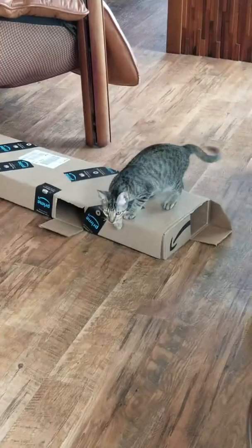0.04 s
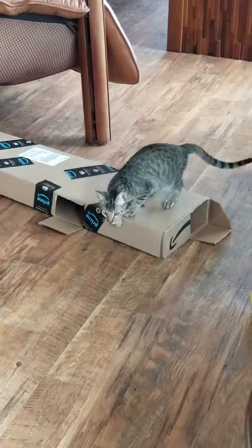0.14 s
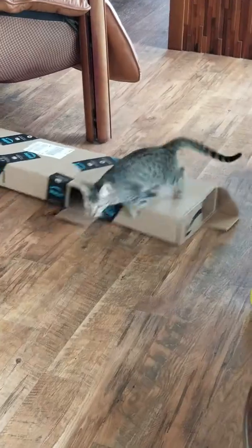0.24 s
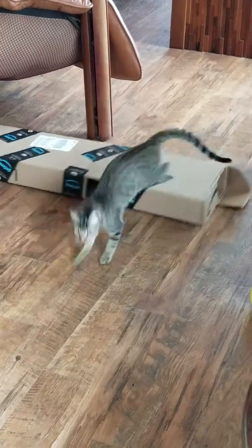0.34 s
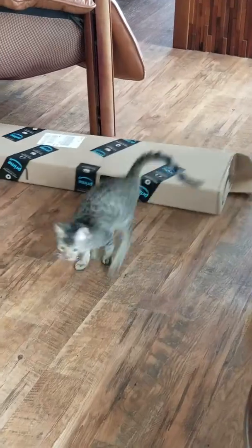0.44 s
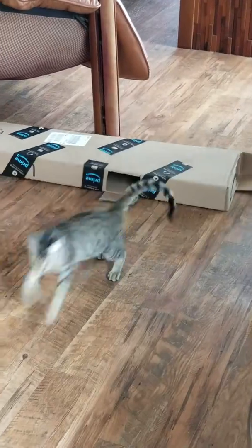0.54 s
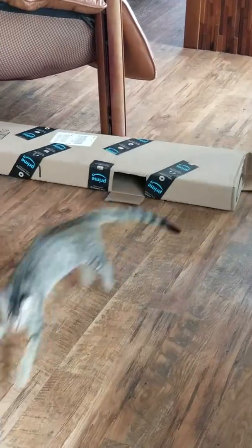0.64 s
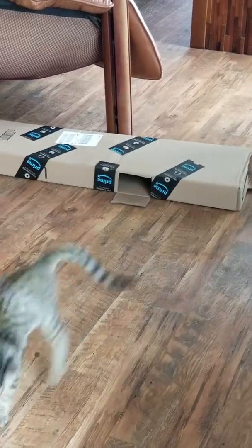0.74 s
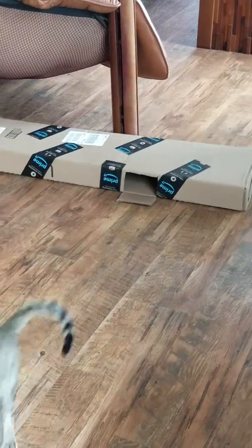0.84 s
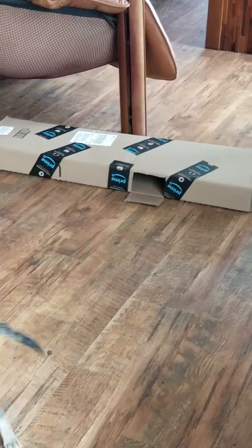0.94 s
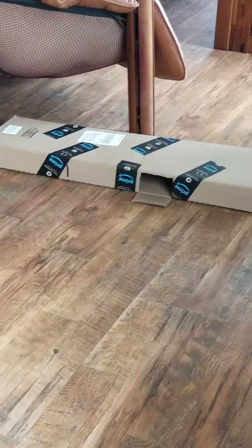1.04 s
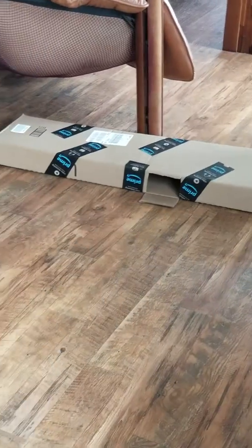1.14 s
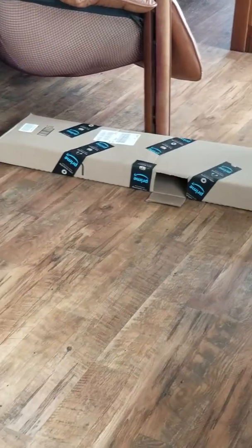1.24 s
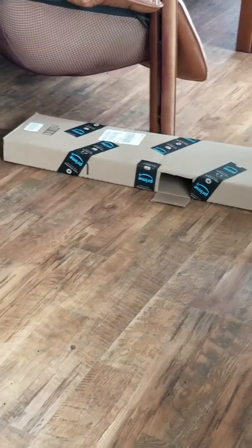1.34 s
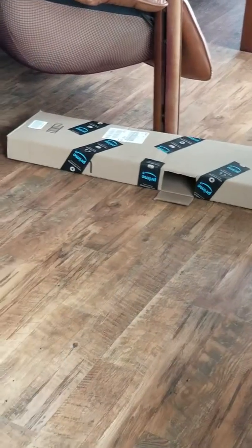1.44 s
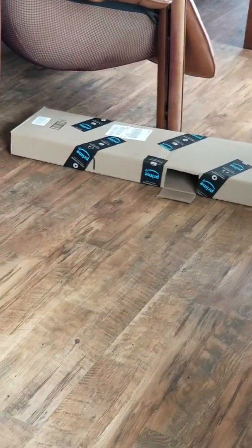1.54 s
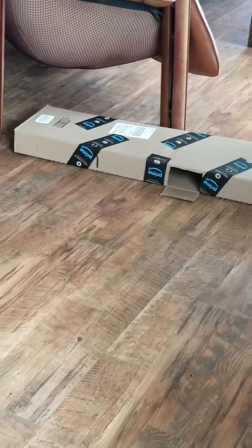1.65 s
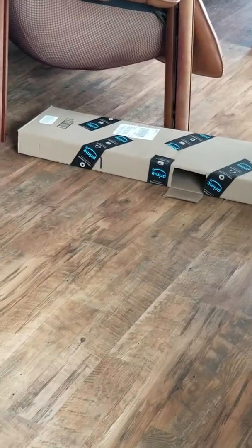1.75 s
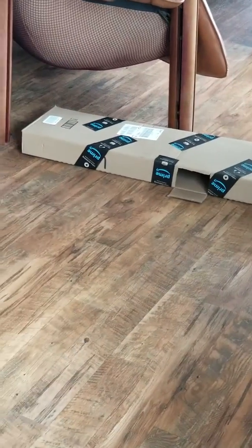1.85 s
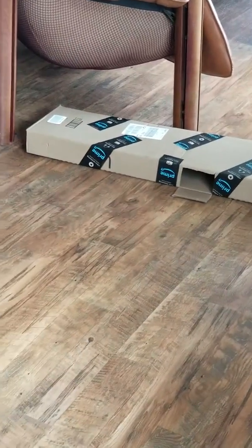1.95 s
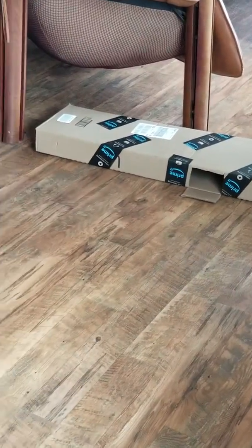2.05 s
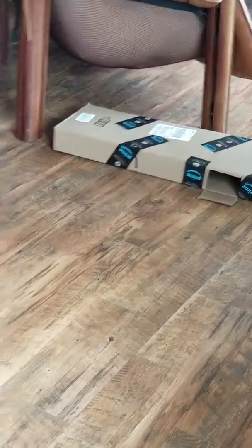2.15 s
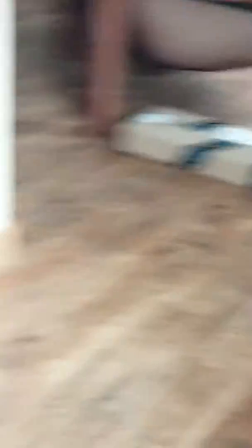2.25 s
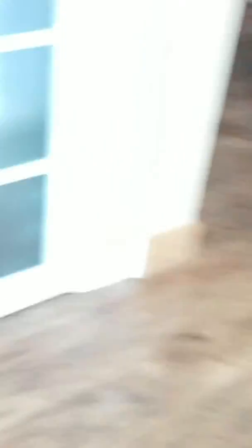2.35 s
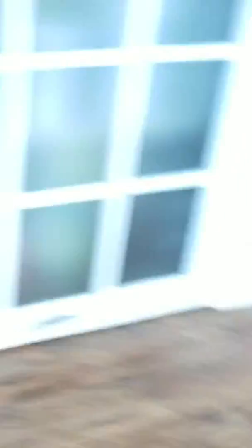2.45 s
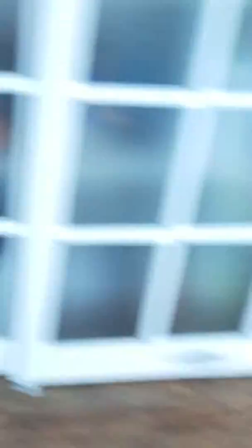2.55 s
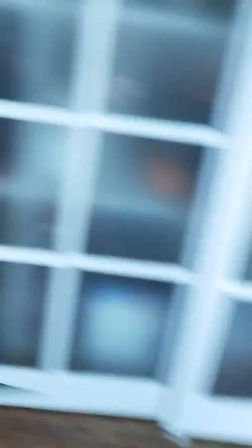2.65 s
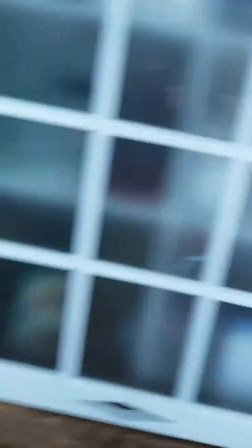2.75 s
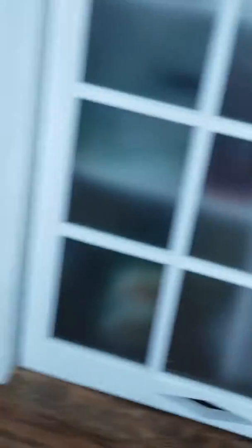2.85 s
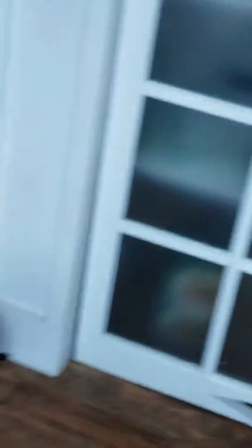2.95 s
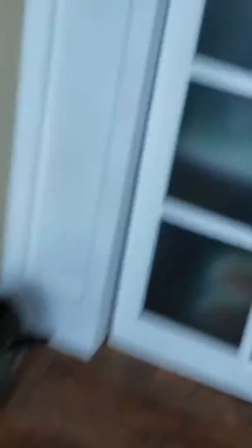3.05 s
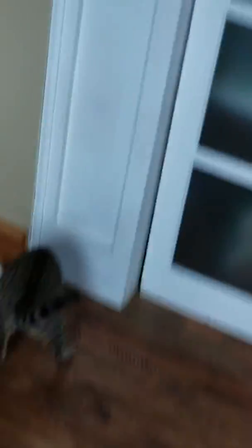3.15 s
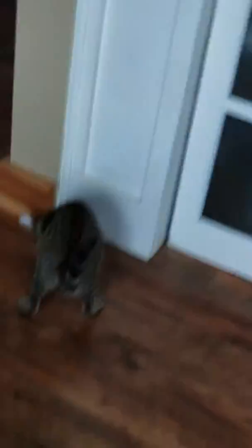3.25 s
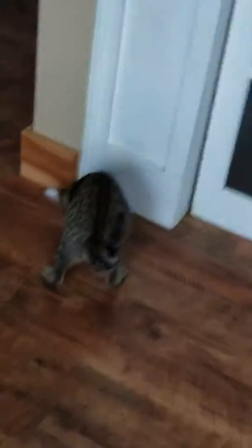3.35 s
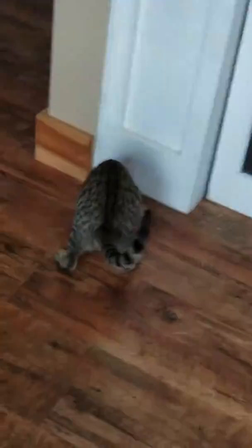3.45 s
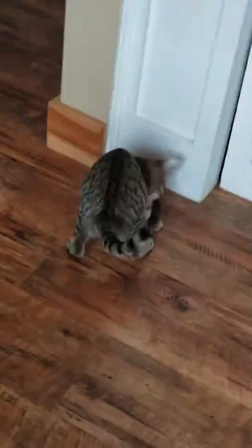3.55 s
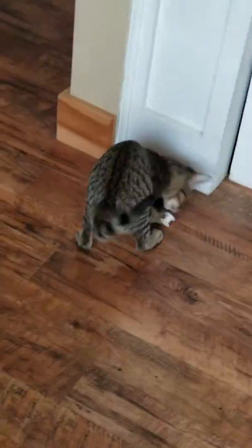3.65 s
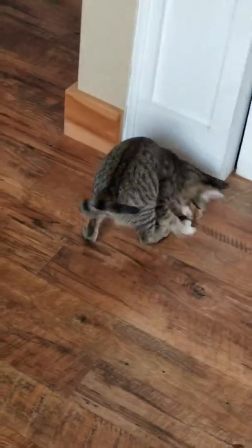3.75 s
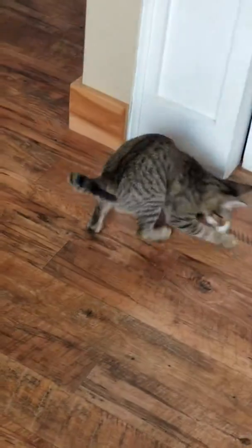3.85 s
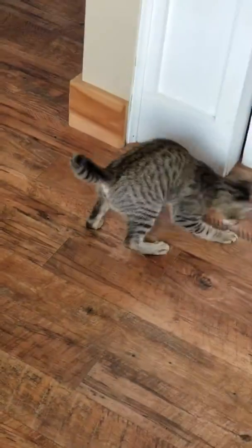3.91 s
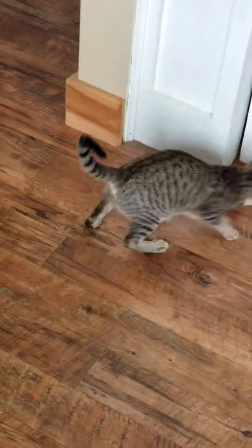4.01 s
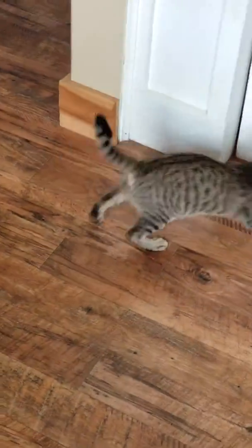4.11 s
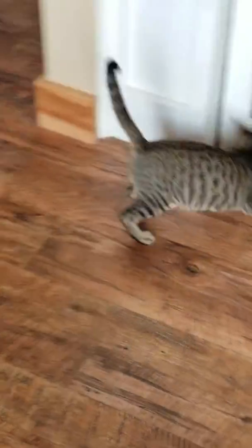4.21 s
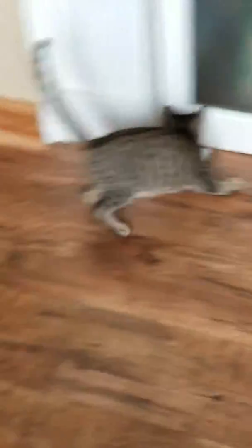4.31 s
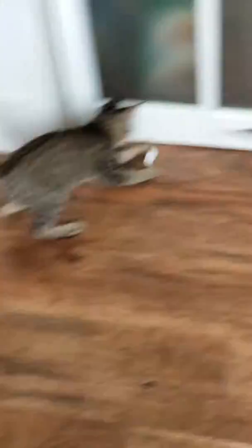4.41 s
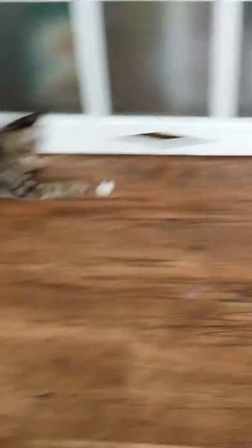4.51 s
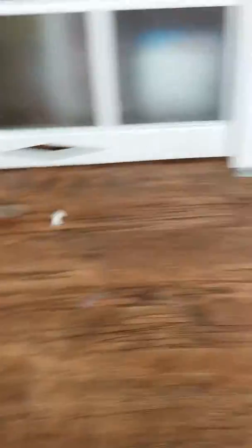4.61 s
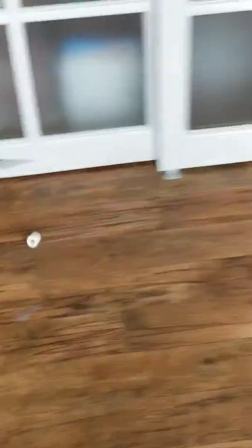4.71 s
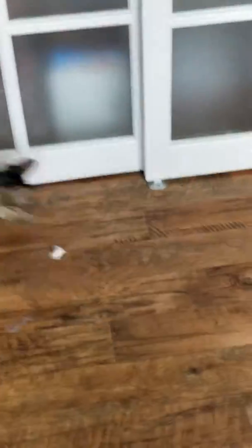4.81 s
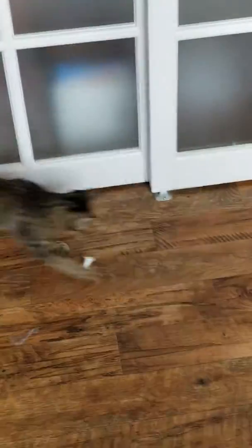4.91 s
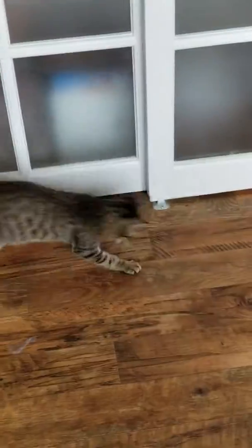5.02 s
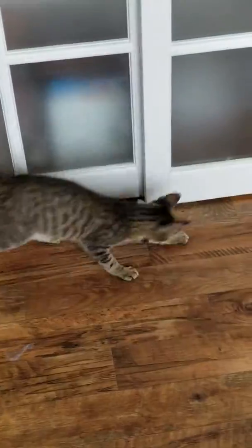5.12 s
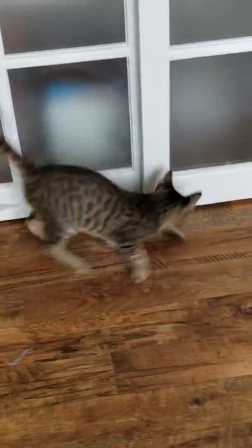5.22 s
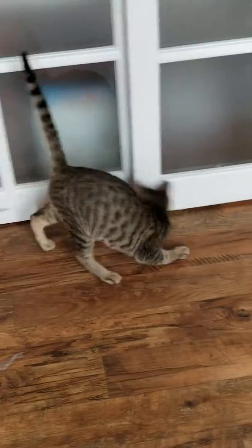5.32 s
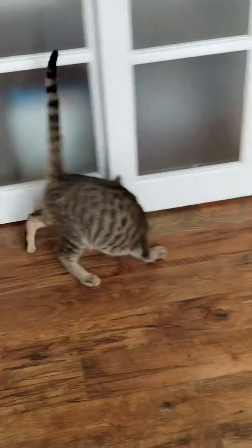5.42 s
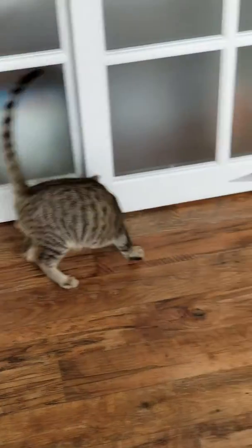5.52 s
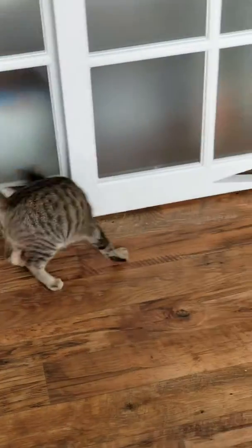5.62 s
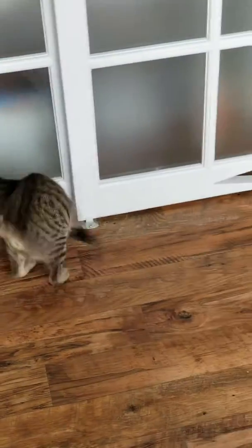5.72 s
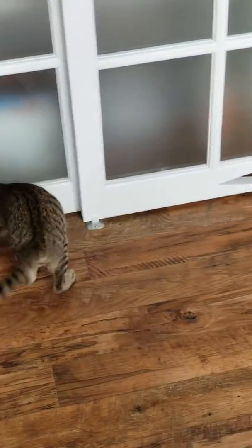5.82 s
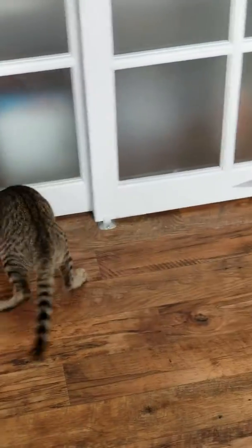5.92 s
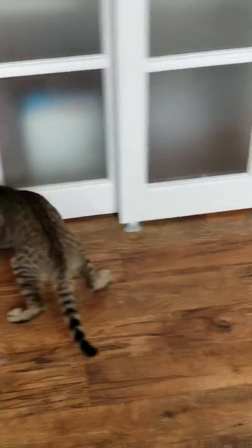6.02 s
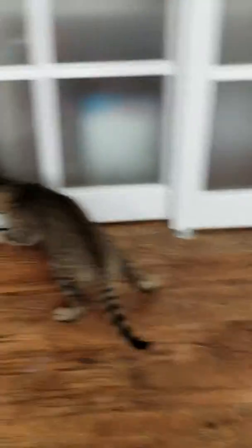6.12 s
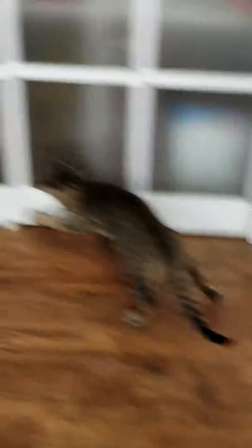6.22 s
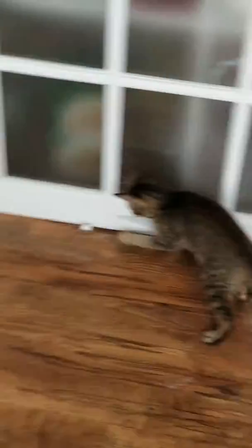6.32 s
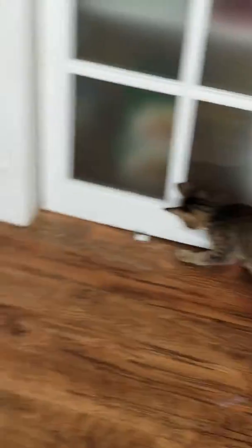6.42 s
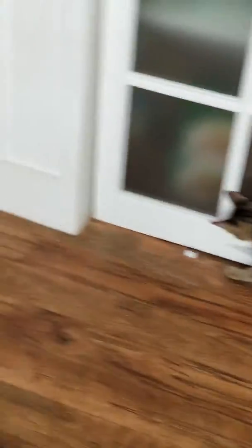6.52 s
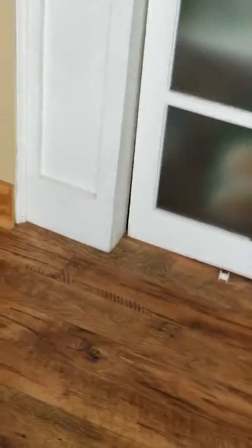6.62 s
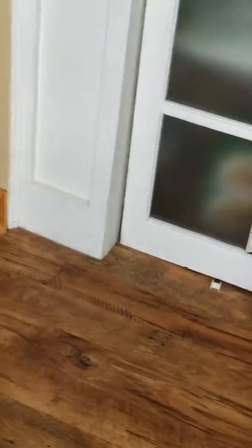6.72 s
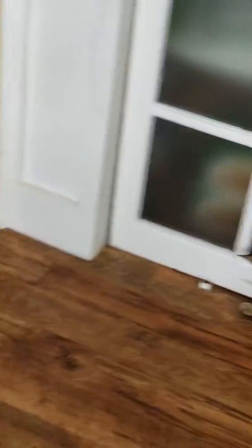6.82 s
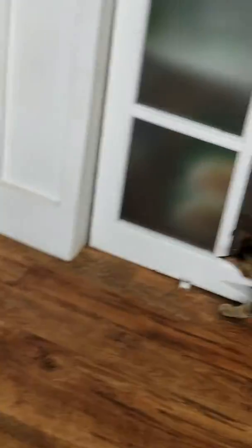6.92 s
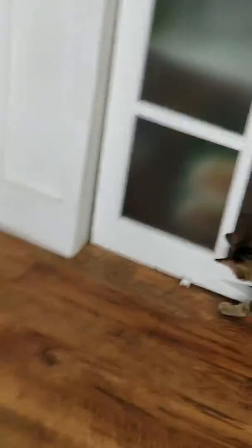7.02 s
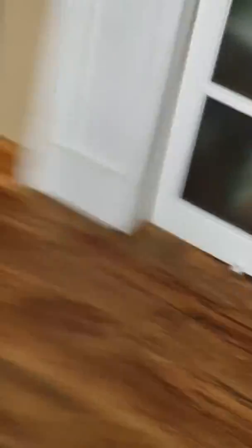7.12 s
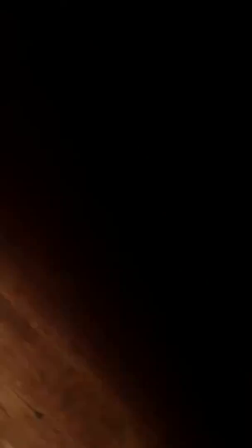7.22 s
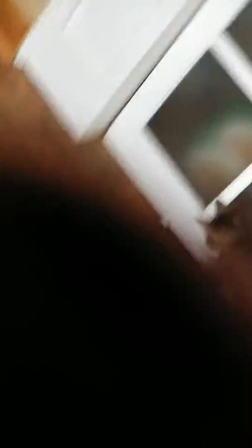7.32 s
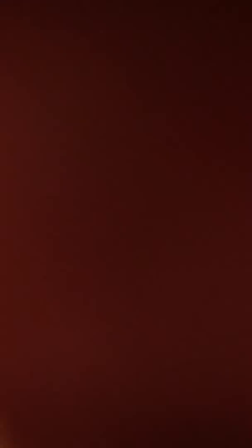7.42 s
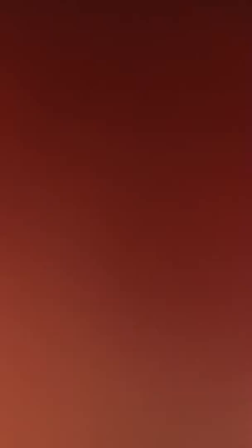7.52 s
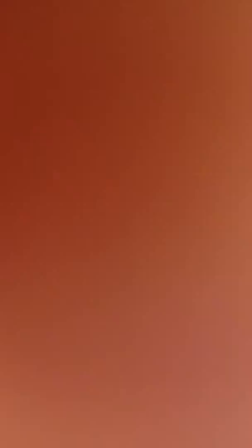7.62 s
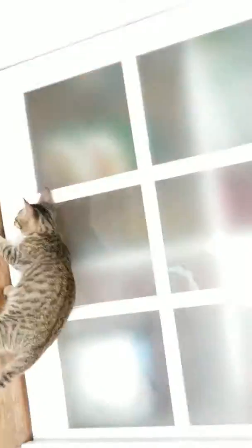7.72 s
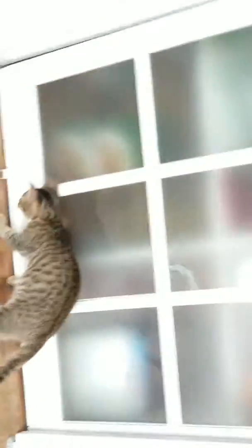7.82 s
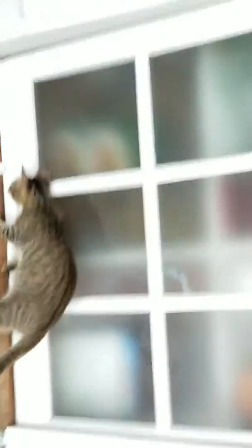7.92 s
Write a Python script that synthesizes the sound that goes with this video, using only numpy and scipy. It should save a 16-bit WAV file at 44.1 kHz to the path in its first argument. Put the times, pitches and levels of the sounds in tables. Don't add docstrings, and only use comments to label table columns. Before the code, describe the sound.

A cat bats a small hard toy with a tiny bell across bare wooden boards, knocking and jingling, before a hand rubs the microphone.

```python
import sys
import numpy as np
from scipy import signal
from scipy.fft import rfft, irfft, next_fast_len
from scipy.io import wavfile
from scipy.ndimage import uniform_filter1d, map_coordinates

SR = 44100
rng = np.random.default_rng(int(sys.argv[2]) if len(sys.argv) > 2 else 0)


def persist_wave(psi):
    counts = np.round(np.clip(psi, -1, 1) * 32767).astype(np.int16)
    wavfile.write(sys.argv[1], SR, np.atleast_2d(counts).T)


def undo_db(level):
    steps = np.asarray(level, float) / 20
    return 10 ** steps


N = 351036

# (time [s], peak level [dB], pitch [Hz], dull part [dB], ringing part [dB])
HITS = [(0.6688, -45.5, 2300, -16, -11), (0.8612, -31.5, 3900, -17.5, 6), (0.8926, -10, 1050, -28.5, -0.5),
        (1.0452, -28.5, 1920, -26, -2), (1.1686, -27, 2440, -9, 0.5), (1.3673, -23.5, 1330, -25, 6),
        (1.52, -32, 2480, -30, 4.5), (1.604, -29.5, 1970, -8, 3.5), (1.816, -32, 1070, -1.5, 2.5),
        (2.2552, -46.5, 2920, -25, 11), (2.4689, -44, 3620, 1.5, -12), (2.7832, -45, 850, -5, 3),
        (3.121, -53.5, 2065, -1, 1.5), (3.8007, -20.5, 2115, -32, 3.5), (3.941, -13.5, 1470, -11, 3.5),
        (4.15, -11, 2240, -17, -5), (4.59, -25.5, 2120, -33, 2.5), (4.6583, -42, 1090, -26, 15.5),
        (4.939, -18.5, 2040, -27, 4.5), (5.0819, -20.5, 1840, -6.5, 4), (5.472, -38, 1030, 3, 7),
        (5.659, -30.5, 2300, -10, -1), (5.767, -26.5, 2010, -5.5, -4), (5.8055, -12, 2200, -50, -19),
        (5.9427, -41.5, 2060, -1, 14), (6.2524, -34, 2100, -19, -1), (1.9638, -42.5, 1680, 5, 10.5)]
# (time [s], peak level [dB], pitch [Hz], dull part [dB], ringing part [dB])
TAPS = [(1.1154, -33.5, 1200, -17, 6.5), (1.3018, -22, 2080, -24, 4), (1.424, -25, 2670, -27, 3.5),
        (1.9556, -34.5, 920, 3, 6.5), (2.11, -43, 890, 0, 6), (2.6728, -42.5, 2400, -11, 6),
        (3.649, -40, 1290, -7, 3), (3.6694, -33, 1220, -24, 0), (3.713, -28, 1960, -32, 2),
        (3.7872, -32.5, 1750, -32, -2), (4.1128, -31.5, 1000, -6, 12.5), (4.2624, -29, 3320, -19, 4.5),
        (4.369, -34.5, 1010, -29, 11), (4.4355, -30, 2100, -38, -2), (4.51, -38, 1520, -5, 12.5),
        (4.7316, -35, 1830, -14, 4), (4.7905, -43, 1800, 2, 12.5), (4.873, -42, 1460, 3, 12.5),
        (5.2019, -26.5, 2040, -10, 5), (5.234, -28, 1820, -2, 4.5), (6.0161, -37.5, 1720, -1, 6.5),
        (6.115, -38, 1700, -2.5, 10), (6.319, -38.5, 1680, -13, 9.5), (6.351, -38.5, 2120, -7.5, 3.5),
        (4.402, -32.5, 1950, -27, 4), (2.395, -56.5, 2600, -20, 12), (2.529, -50.5, 700, 5, 17),
        (2.6, -53, 666, -1, 19.5), (2.735, -51, 600, -10, 15.5), (2.142, -44, 447, -14, 14.5),
        (6.152, -43, 3450, -20, -11), (3.848, -31, 2140, -28, -3), (3.9003, -52, 3000, -28, -2)]
HIT_BRIGHT_DB, TAP_BRIGHT_DB = -14.5, -17.5
HIT_TOP_HZ, TAP_TOP_HZ = 4400, 3200
DIRECT_DB = 0.5
NEAR_SHARE = 0.6
PLACES = 4

# (time [s], pitch [Hz], peak level [dB])
SHELL_RINGS = [(0.8926, 790, -36), (0.8926, 2020, -33.5), (0.8931, 2510, -29.5), (0.8926, 3740, -26),
               (0.8926, 4216, -30.5), (3.8016, 1360, -35), (3.7991, 3180, -38), (3.8003, 4230, -32),
               (3.941, 926, -27), (3.941, 1904, -32), (3.941, 2050, -26), (3.941, 2440, -33),
               (3.941, 3400, -34), (3.941, 4620, -40), (4.1506, 933, -28.5), (4.1506, 1570, -37),
               (4.1503, 3360, -35), (4.1503, 3740, -29.5), (4.1498, 4070, -28), (4.589, 4190, -41),
               (4.1503, 5300, -40), (4.1503, 6400, -36), (5.806, 5900, -31), (5.8055, 6540, -35),
               (3.8003, 4970, -38), (5.658, 6450, -41), (5.658, 5160, -48), (4.51, 1520, -41),
               (4.873, 1203, -42), (1.815, 1090, -44), (1.9585, 750, -45), (1.9585, 1200, -43),
               (2.115, 794, -51), (6.116, 1900, -45.5), (1.815, 1980, -44.5), (1.9585, 2286, -46),
               (6.0177, 1700, -46), (4.939, 1023, -37), (4.938, 2330, -39), (4.94, 2500, -41),
               (4.939, 3010, -40), (4.939, 3780, -35.5), (5.0818, 4220, -38), (5.659, 4300, -45),
               (5.658, 5800, -52), (5.8056, 1670, -36), (5.8055, 2030, -32), (5.8057, 3156, -31.5),
               (5.8055, 3540, -32), (5.8049, 4640, -28), (5.8055, 5050, -32)]
SHELL_T60_S, SHELL_ROOM_DB = 0.037, 6.5

# (time [s], peak level [dB], second pair [dB], third pair [dB], upper modes [dB])
JOLTS = [(0.862, -32, 4, -2, -3.5), (0.894, -28, 9.5, -2, -1.5), (1.049, -37, 5, 14, 6),
         (1.168, -35, -1, 6, -5), (1.36, -33, 3, 7, -3), (1.521, -40, 8, 6, -3), (1.6006, -38, -8, -5, -8),
         (1.649, -40.5, -2, 5, -1.5), (1.8139, -40.5, 2.5, 16, 4.5), (1.96, -49, 11, 19.5, 10.5),
         (2.116, -48, -6, 5.5, 0.5), (2.252, -32.5, -10, -11, -23), (2.2792, -44, -19, -17, -28),
         (2.673, -47, -2, -21, -26), (3.651, -52, 11, -12, -14), (3.669, -47.5, 14.5, -8, -3.5),
         (3.803, -33, 3, -16, -6), (3.8996, -34, 10.5, 12, 1.5), (3.943, -33.5, 4, 17, 9),
         (4.118, -37.5, 3, -9, -1), (4.151, -16.5, -7, -19, -13), (4.369, -46.5, 3, 14, 4),
         (4.59, -29.5, -5.5, -1.5, -9), (4.653, -45, -5, 3, 2.5), (4.791, -40.5, 5, 11, 1),
         (4.9417, -30, 9.5, 6, -6), (5.0834, -32, 5.5, -1, -7), (5.491, -36, 2, -8, -10),
         (5.5007, -42, 4, 1, -7.5), (5.659, -33.5, 5.5, -12, -12), (5.7658, -30.5, 0, -11, -4),
         (5.8067, -16.5, -5.5, 0.5, -6), (6.02, -47, 4, 14, 6), (6.118, -51.5, -8, 15, 6),
         (6.253, -43.5, -3, 9, -5), (6.32, -48, 7, -9, -22), (6.352, -53, 2, -10, -14),
         (4.435, -44, -2, 20, 0.5), (4.7316, -47.5, 0, 8, -6), (4.873, -50.5, -3, 3, 7)]
# (pitch [Hz], level [dB], t60 [s])
BELL_MODES = [(7052, 2, .18), (7130, -5, .1), (7365, -6, .1), (7480, -5, .1), (7570, -5, .1),
              (7780, -12, .05), (8345, -6, .09), (8580, -8, .06), (9350, -14, .05), (10900, -21, .03),
              (12190, -4, .06), (12400, -7, .04), (12590, -4, .055), (14080, -4, .04)]
BELL_GROUPS_HZ = [7250, 8000, 9000]
TAP_SHAKE_DB = -13
PELLET_GAP_S = 0.009
RING_SHARE = 0.55

# (time [s], peak level [dB], pitch [Hz])
THUMPS = [(0.2, -21.5, 315), (0.284, -24, 82.5), (0.67, -30, 473), (0.828, -31.5, 213), (1.038, -45, 233),
          (1.299, -28.5, 162), (1.586, -36, 152), (1.722, -33.5, 91), (1.7185, -39, 770), (1.879, -38, 331),
          (3.801, -41, 815), (1.877, -31.5, 210), (1.964, -65, 198), (2.287, -55, 149), (2.459, -60, 90),
          (2.54, -50, 97), (2.791, -54, 88), (3.017, -69, 56), (3.702, -46.5, 275), (3.802, -40, 221),
          (3.95, -25.5, 352), (4.146, -36, 332), (4.376, -46.5, 77), (4.898, -41, 145), (5.002, -42.5, 152),
          (5.09, -36, 204), (5.238, -22.5, 178.6), (5.801, -28.5, 240), (6.22, -39, 178)]

# (time of peak [s], hiss level [dB], rise [s], fall [s], drumming minus hiss [dB])
SKIDS = [(0.7, -58.5, 0.11, 0.47, 0), (0.85, -54, 0.15, 0.22, -2), (0.92, -47.5, 0.11, 0.47, -13),
         (1.13, -44.5, 0.23, 0.19, 0), (1.39, -34.5, 0.13, 0.16, -8.5), (1.65, -54.5, 0.22, 0.21, 8.5),
         (1.97, -57, 0.27, 0.22, 7), (2.28, -57, 0.033, 0.18, 2.5), (2.58, -71.5, 0.27, 0.7, 18.5),
         (2.8, -61.5, 0.06, 0.16, 9), (2.91, -70, 0.08, 0.17, 16), (3.83, -46, 0.065, 0.44, -25),
         (4.02, -57, 0.091, 0.19, -19), (4.31, -53, 0.05, 0.41, -15), (4.7, -74, 0.79, 0.67, 24.5),
         (5.1, -48, 0.16, 0.24, 5.5), (5.28, -44, 0.12, 0.23, 6.5), (5.52, -45, 0.12, 0.19, 7),
         (5.6, -72, 0.12, 0.087, -10), (2.68, -66, 0.17, 0.24, 2), (5.9, -48.5, 0.41, 0.34, 7),
         (6.3, -61.5, 0.18, 1, 1), (6.65, -70.5, 0.44, 0.26, 15.5)]
# (time [s], hiss level [dB])
BOX_SLIDE = [
    (0.1, -85),
    (0.12, -89),
    (0.162, -45.5),
    (0.218, -36),
    (0.492, -54.5),
    (0.602, -72.5),
    (0.66, -74.5),
]
# (frequency [Hz], density [dB per Hz])
SKID_COLOUR = [(530, -29), (900, -9), (2040, 1.5), (3340, -0.5), (3710, 5), (9000, -3.5), (11700, -36.5),
               (19800, -120)]
# (frequency [Hz], width [Hz], level [dB])
BOARDS = [(169, 15.5, 8.5), (352, 35, -12), (700, 430, -5.5), (874, 14, -1.5)]
SLIDE_DB, BOX_DRUM_DB, BOX_DRUM_FOLLOWS = 3.5, -37.5, 0.55
AIR_DB, AIR_FOLLOWS = -46.5, 1.286
DRUM_PATCHY_DB = 2.2

# (time [s], level [dB])
SWISH = [
    (.55, -73),
    (.62, -67),
    (.72, -56),
    (.85, -56.5),
    (.9, -89.5),
]

# (time of peak [s], rub level [dB], rise [s], fall [s], bright part minus rub [dB])
STROKES = [(2.8, -73.5, .03, 0.081, 15), (3.0, -79, 0.35, 0.4, 14), (6.47, -69.5, 0.068, 0.31, 10),
           (6.61, -56, 0.11, 0.22, 5), (6.66, -59, .05, .05, 11), (6.77, -63, 0.059, .05, 5),
           (6.72, -64.5, 0.073, 0.093, 17), (6.85, -56, 0.044, 0.045, -18),
           (6.915, -68, 0.036, 0.041, 17.5), (7.025, -53, 0.0075, 0.18, -17),
           (7.13, -48.5, 0.077, 0.15, 16.5), (7.19, -40.5, 0.14, 0.087, 5), (7.285, -42.5, 0.17, 0.2, 2.5),
           (7.42, -42.5, 0.009, 0.009, -1), (7.49, -52.5, 0.19, 0.22, -30), (7.64, -49.5, 0.14, 0.13, 4.5),
           (7.72, -51, 0.11, 1, -26), (7.83, -45.5, 0.0081, 0.34, 1.5), (7.9, -41, 0.078, 0.061, 11.5)]
# (frequency [Hz], density [dB per Hz])
RUB_COLOUR = [(590, -15.5), (1000, 1), (3590, 4), (4330, 3), (5050, -1), (7000, -9.5), (9100, -21),
              (15400, -120)]
# (time [s], left minus right [dB])
GRASP = [
    (6.4, -7),
    (6.55, 1.5),
    (6.65, -8),
    (6.86, -8.5),
    (6.93, -18),
    (7.008, -37),
    (7.016, 15.5),
    (7.96, 16.5),
]
# (time [s], share [0-1])
CUPPED = [
    (7.0, 0.5),
    (7.1, 0.76),
    (7.25, 0.7),
    (7.36, 1),
    (7.415, 1),
    (7.44, 0),
    (7.7, 0.4),
    (7.96, 0.76),
]
# (time [s], peak level [dB], pitch [Hz], left minus right [dB])
TICKS = [(6.225, -22.5, 1930, 9.0), (6.2245, -41.5, 450, 6), (7.0562, -37, 1870, 14), (7.017, -52, 730, 15),
         (6.981, -46.0, 2200, 17), (7.0168, -24.5, 2950, 17), (7.032, -37, 2400, 8.0),
         (7.056, -29.5, 1720, 15.0), (7.0557, -23, 3400, 14.0), (7.182, -46.0, 860, 17),
         (7.278, -44.5, 1050, 15), (7.13, -29, 3680, 22), (7.418, -52, 3100, 17.0),
         (2.1535, -33.5, 14300, 7), (2.5277, -50, 6980, -1), (2.617, -49, 5530, 6), (2.6524, -48, 7400, 6),
         (3.0849, -54, 3780, -5)]
DULL_DB, DULL_FOLLOWS = -54, 0.042
DULL_TILT = 0.1
LIFT_S, LIFT_DB = (6.945, 7.014), -19
TICK_CYCLES, TICK_BRIGHT_HZ = 11, 4600
TICK_ECHO, TICK_ECHO_SHARE = 13, -0.45

# (time [s], peak level [dB])
GRIP = [(0.273, -53), (0.431, -40), (0.849, -45), (1.098, -49), (1.339, -47), (1.589, -44), (1.717, -47),
        (1.889, -44), (2.299, -64), (2.461, -67), (2.569, -66), (2.779, -61), (3.019, -63), (3.129, -75),
        (3.803, -60), (4.089, -56), (4.199, -63), (4.367, -63), (4.898, -57), (5.239, -56), (5.839, -65),
        (6.219, -45), (6.424, -55), (6.699, -71), (7.087, -44), (7.169, -46), (7.278, -40), (7.619, -50),
        (7.879, -47)]
# (frequency [Hz], t60 [s])
ROOM_T60 = [(100, 0.65), (500, 0.41), (2000, 0.56), (4500, 0.55), (8000, 0.39), (15000, 0.2)]
# (frequency [Hz], density [dB per Hz])
HUSH_COLOUR = [(14, -33.5), (38, -8.5), (49, -18), (150, -15.5), (232, -8.5), (404, -8), (700, -7),
               (15500, -17.5)]
HUSH_DB = -73.5
LEFT_DB = 0.7
CUTOFF_HZ = 15750


def knocks():
    s, peak_db, pitch_hz, dull_db, ring_db = np.transpose(HITS + TAPS)
    bright_db = np.repeat([HIT_BRIGHT_DB, TAP_BRIGHT_DB], [len(HITS), len(TAPS)])
    t = np.arange(900) / SR
    rattle = rng.standard_normal((len(s), 3, len(t))) * 0.05 * np.exp(-t / 0.0015)
    rattle[:, :, 0] = 1
    dull, full, bright = rattle.transpose(1, 0, 2)
    middle = np.array([band(r, hz / 1.114, hz * 1.093, order=1) for r, hz in zip(full, pitch_hz)])
    toy_broad = band(full[:len(HITS)], 976, HIT_TOP_HZ)
    paw_broad = band(full[len(HITS):], 660, TAP_TOP_HZ, order=3)
    crack = undo_db(ring_db + 1.5)[:, None] * middle + 0.75 * np.vstack([toy_broad, paw_broad])
    crack -= undo_db(dull_db + 7.0)[:, None] * band(dull, 199, 840)
    crack -= undo_db(bright_db + 5.5)[:, None] * band(band(bright, 2800, 22000), 1400, 7900, order=1)
    crack *= undo_db(peak_db + 11.0)[:, None]
    times = s[:, None] + t
    direct = crack * undo_db(DIRECT_DB + NEAR_SHARE * ring_db)[:, None]
    straight = train(times.ravel(), direct.ravel())
    blows = [train(times[k::PLACES].ravel(), crack[k::PLACES].ravel()) for k in range(PLACES)]
    return straight, np.array(blows)


def shell():
    t = np.arange(SR // 10) / SR
    s, hz, peak_db = np.transpose(SHELL_RINGS)[:, :, None]
    rings = undo_db(peak_db - 60 * t / SHELL_T60_S) * np.sin(2 * np.pi * hz * t)
    return train((s + t).ravel(), rings.ravel())


def bell():
    shakes = [(s, db + TAP_SHAKE_DB, 0, 0, 1.13 * min(db + 20.5, 0)) for s, db, *_ in TAPS]
    s, peak_db, second_db, third_db, upper_db = np.transpose(JOLTS + shakes)
    after = np.cumsum(rng.exponential(PELLET_GAP_S, (len(s), 12)), axis=1)
    after -= after[:, :1]
    times = (s[:, None] + after).ravel()
    chance_db = rng.normal(0, 4, (len(s), 12, len(BELL_MODES)))
    chance_db = chance_db + rng.normal(0, 3, (len(s), 1, len(BELL_MODES)))
    sign = rng.choice([-1, 1], after.shape)
    groups_db = [0, second_db + 3.5, third_db + 2.5, upper_db + 13.0]
    out = 0
    for k, (hz, level_db, t60) in enumerate(BELL_MODES):
        group_db = groups_db[np.searchsorted(BELL_GROUPS_HZ, hz)]
        jolt_db = peak_db + level_db + group_db - 11.5
        taps_db = jolt_db[:, None] - 230 * after - 7.3 * (after > 0) + chance_db[:, :, k]
        out = out + ring(train(times, (undo_db(taps_db) * sign).ravel()), hz, RING_SHARE * t60)
    travel = 0.0002 * SR * uniform_filter1d(drift(9), size=3000)
    travel = travel + 0.00007 * SR * uniform_filter1d(drift(70), size=400)
    return map_coordinates(out, [np.arange(N) + travel], order=3)


def thumps():
    out, t = np.zeros(N + SR), np.arange(SR // 4) / SR
    puff = rms_one(band(rng.standard_normal(N + SR), 120, 425))
    for s, peak_db, hz in THUMPS:
        at = slice(round(s * SR), round(s * SR) + len(t))
        push = np.sin(2 * np.pi * hz * t) * np.exp(-t * hz / 3.63)
        push = push + 0.3 * puff[at] * np.exp(-t / 0.081)
        out[at] += undo_db(peak_db - 9.0) * push * (1 - np.exp(-t / 0.00076))
    return out[:N]


def skid():
    skid_db, drum_db = strokes(SKIDS)
    resting = np.arange(N) / SR > BOX_SLIDE[-1][0]
    slide_db = in_time([BOX_SLIDE])[0] + SLIDE_DB - 99 * resting
    hiss_db = np.maximum(skid_db, slide_db)
    air_db = AIR_DB + AIR_FOLLOWS * (hiss_db + 34.0)
    grain = undo_db(1.3 * drift(70))
    hiss = undo_db(hiss_db + 3.5) * coloured(SKID_COLOUR, channels=3)
    air = undo_db(air_db + 16.5) * rms_one(band(rng.standard_normal((3, N)), 7700, 14900))
    white = rng.standard_normal((3, N))
    modes = sum(undo_db(db) * band(white, hz - width / 2, hz + width / 2, order=1) for hz, width, db in BOARDS)
    box = rms_one(band(white + modes, 140, 600, order=3))
    boards = rms_one(band(white, 130, 1200) + modes)
    box_db = BOX_DRUM_DB + BOX_DRUM_FOLLOWS * (slide_db + 27)
    drum = undo_db(box_db) * box + undo_db(drum_db) * boards
    drum = undo_db(-6.5 + DRUM_PATCHY_DB * drift(25)) * (drum[0] + 0.65 * drum[1:])
    high = grain * (hiss + air)
    return 0.29 * high[0] + 0.66 * high[1:] + drum


def swish():
    level_db, = in_time([SWISH])
    t = np.arange(N) / SR
    sounding = (t > SWISH[0][0]) & (t < SWISH[-1][0])
    return sounding * undo_db(level_db) * rms_one(band(rng.standard_normal((2, N)), 4700, 6200))


def hand():
    rub_db, bright_db = strokes(STROKES)
    dull_db = DULL_DB + DULL_FOLLOWS * (rub_db + 61) - DULL_TILT * (bright_db - rub_db)
    dull_db = np.minimum(dull_db, rub_db + 13.0)
    pan_db, = in_time([GRASP])
    grain = undo_db(1.5 * drift(90))
    rub = undo_db(rub_db + 1.0) * coloured(RUB_COLOUR, channels=3)
    rub += undo_db(bright_db - 5.0) * rms_one(band(rng.standard_normal((3, N)), 3100, 14000))
    rub -= 0.3 * band(rub, 9000, 11100) - 0.29 * band(rub, 7300, 8100)
    sides = undo_db(np.minimum(0, pan_db * [[1], [-1]]) + 10.5)
    out = sides * grain * (0.49 * rub[0] + 0.65 * rub[1:])
    dull = rms_one(band(rng.standard_normal((3, N)), 133, 2100))
    out += undo_db(dull_db - 11.0) * (1.1 * dull[0] + 0.69 * dull[1:])
    lifted = 1.0 * (np.searchsorted(LIFT_S, np.arange(N) / SR) == 1)
    out *= undo_db(LIFT_DB * uniform_filter1d(lifted, size=300))
    out -= np.clip(in_time([CUPPED])[0], 0, 1) * band(out, 390, 1960, order=1)
    return out + ticks()


def ticks():
    out = np.zeros((2, N))
    for s, peak_db, hz, left_db in TICKS:
        click = train([s], undo_db(peak_db + 9.0))
        tick = band(ring(click, hz, TICK_CYCLES / hz), min(hz / 2.1, 4000), 5600)
        tick = tick + undo_db(0.35 * peak_db + 13.5) * band(click, TICK_BRIGHT_HZ, 14000)
        tick[TICK_ECHO:] -= TICK_ECHO_SHARE * tick[:-TICK_ECHO].copy()
        out += tick * undo_db(np.minimum(0, left_db * np.array([[1], [-1]])))
    return out


def grip():
    s, peak_db = np.transpose(GRIP)
    shifts = train(s, undo_db(peak_db + 2.0))
    swell = signal.lfilter([1], [1, -np.exp(-1 / (0.019 * SR))], shifts)
    swell = uniform_filter1d(swell, size=900) + undo_db(-73.5 + 1.6 * drift(9.6))
    rumble = band(rng.standard_normal((3, N)), 28, 110)
    return swell * rms_one(rumble[0] + 0.55 * rumble[1:])


def room(places):
    t = np.arange(int(0.45 * SR)) / SR
    edges = 40 * 2.0 ** np.arange(10)
    patchy = undo_db(5.65 * rng.standard_normal((PLACES, len(t))))
    white = rng.standard_normal((3, PLACES, len(t))) * patchy
    tail = 0
    for k, (low, high) in enumerate(zip(edges, edges[1:])):
        hz = np.sqrt(low * high)
        shared, left, right = band(white, low, high)
        apart = np.clip(hz / 900, 0.1, 1.5)
        sides = (shared + apart * np.array([left, right])) / np.hypot(1, apart)
        tail = tail + (-1) ** k * sides * undo_db(-60 * t / at_hz(ROOM_T60, hz))
    wall = 0.84 * np.exp(-((t - 0.0095) / 0.00065) ** 2)
    near = 1.6 * np.exp(-t / 0.018) + wall
    tail *= (t > 0.0012) * (1 + near)
    tail /= np.sqrt(np.sum(tail ** 2) / 2 / PLACES)
    size = next_fast_len(N + len(t))
    return irfft((rfft(places, size) * rfft(tail, size)).sum(axis=1), size)[:, :N]


def hush():
    noise = coloured(HUSH_COLOUR, channels=3)
    return undo_db(HUSH_DB) * (0.77 * noise[0] + 0.37 * noise[1:])


def strokes(rows):
    s, peak_db, rise, fall, second_db = np.transpose(rows)[:, :, None]
    t = np.arange(0, N, 32) / SR
    power = undo_db(2 * (peak_db - 20 * np.maximum((s - t) / rise, (t - s) / fall)))
    sums = power.sum(axis=0), (power * undo_db(2 * second_db)).sum(axis=0)
    return [np.interp(np.arange(N) / SR, t, 10 * np.log10(p + 1e-12)) for p in sums]


def ring(clicks, hz, t60):
    r, w = undo_db(-60 / (t60 * SR)), 2 * np.pi * hz / SR
    return signal.lfilter([0, np.sin(w)], [1, -2 * r * np.cos(w), r * r], clicks)


def train(seconds, sizes):
    clicks = np.full(N, 1e-18)
    np.add.at(clicks, np.round(np.asarray(seconds) * SR).astype(int), sizes)
    return clicks


def coloured(spectrum, channels=2):
    hz = np.maximum(np.arange(N // 2 + 1) * SR / N, 1)
    white = rng.standard_normal((channels, N))
    return rms_one(irfft(rfft(white) * undo_db(at_hz(spectrum, hz)), N))


def band(x, low_hz, high_hz, order=2):
    edges = [low_hz, min(high_hz, 0.45 * SR)]
    return signal.sosfilt(signal.butter(order, edges, "band", fs=SR, output="sos"), x)


def drift(rate):
    knots = rng.standard_normal(1600)
    return np.interp(np.arange(N) / SR * rate, np.arange(len(knots)), knots)


def rms_one(x):
    return x / np.sqrt(np.mean(x ** 2) + 1e-20)


def in_time(tables):
    s, *columns = np.transpose(np.concatenate(tables))
    return [np.interp(np.arange(N) / SR, s, c) for c in columns]


def at_hz(points, hz):
    table_hz, values = np.array(points)[:, 0], np.array(points)[:, 1]
    return np.interp(np.log(hz), np.log(table_hz), values)


def scene():
    straight, blows = knocks()
    clear, jingle, paws = shell(), bell(), thumps()
    sent = undo_db(11.5) * blows
    sent[0] += undo_db(3.0) * jingle + undo_db(1.5) * paws
    sent[1] += undo_db(SHELL_ROOM_DB) * clear
    far = straight + clear + 0.82 * jingle + paws + room(sent) + skid() + swish()
    return far * undo_db([[LEFT_DB], [-LEFT_DB]]) + hand() + grip() + hush()


def roll_off(x):
    return signal.sosfilt(signal.butter(12, 16670, fs=SR, output="sos"), x)


def record(dry):
    steep = signal.ellip(10, 0.5, 28, CUTOFF_HZ, fs=SR, output="sos")
    mix = signal.sosfilt(steep, dry)
    return roll_off(mix)


dry = scene()
out = record(dry)
persist_wave(out)
```